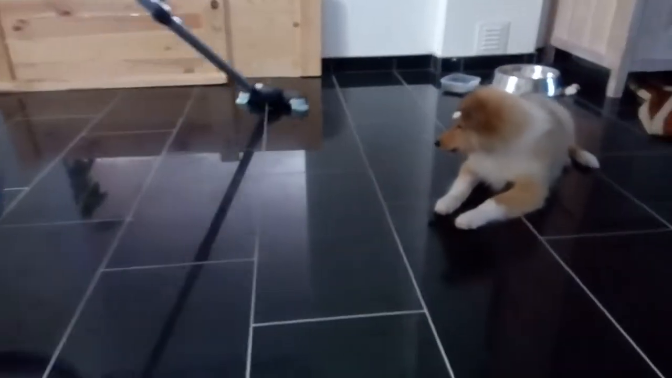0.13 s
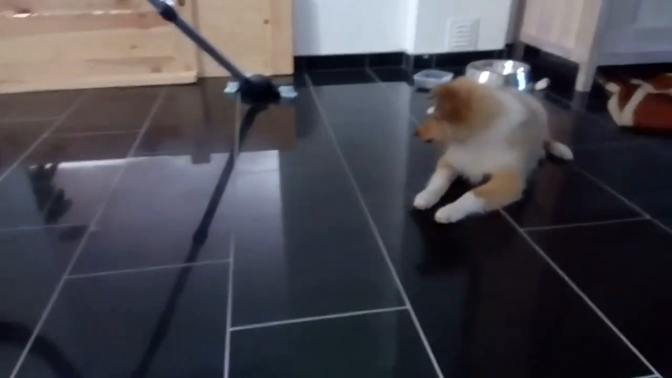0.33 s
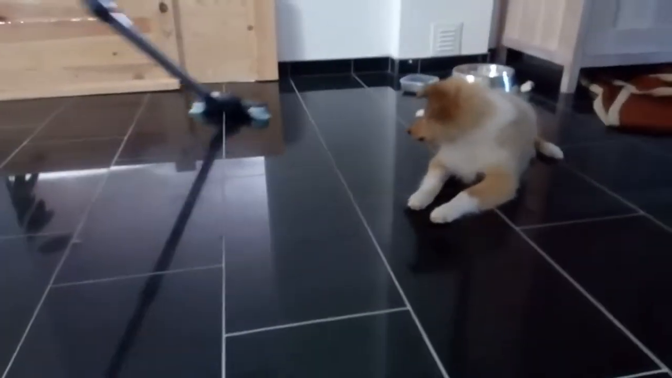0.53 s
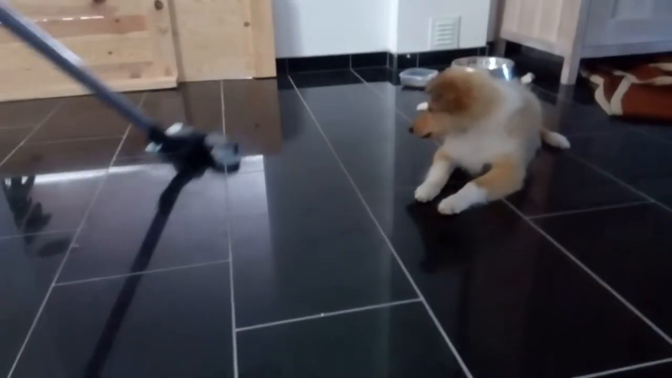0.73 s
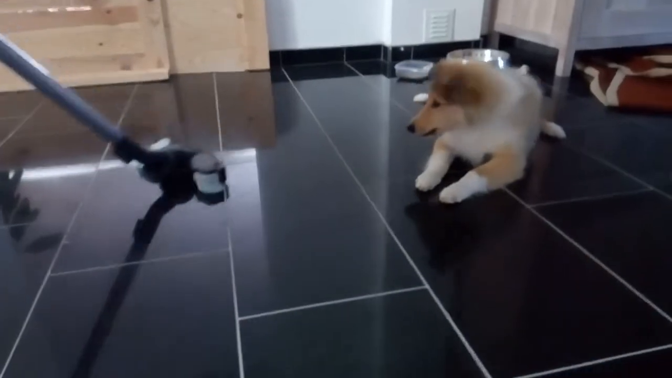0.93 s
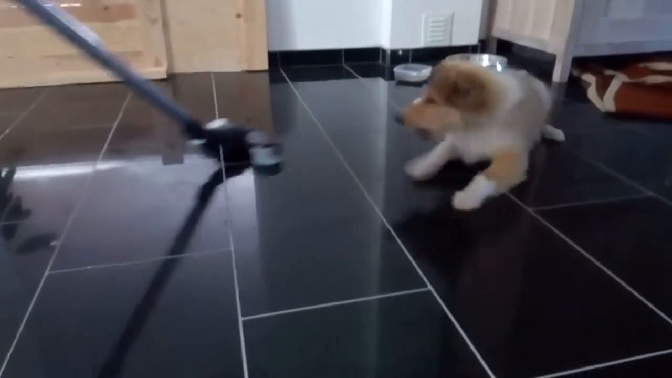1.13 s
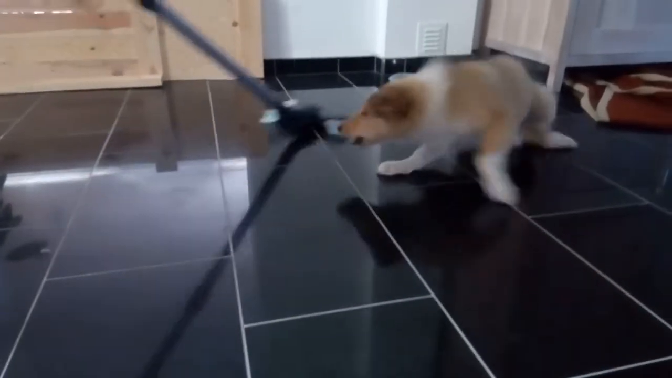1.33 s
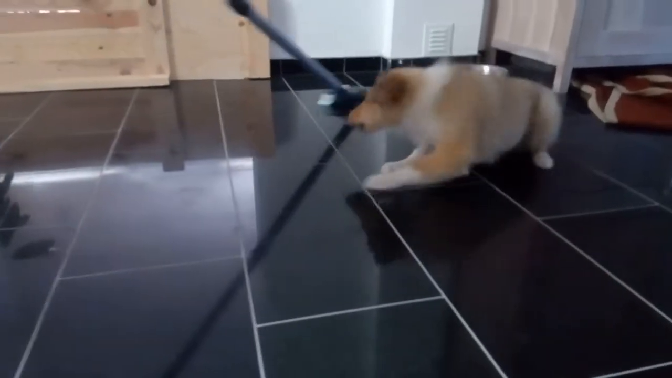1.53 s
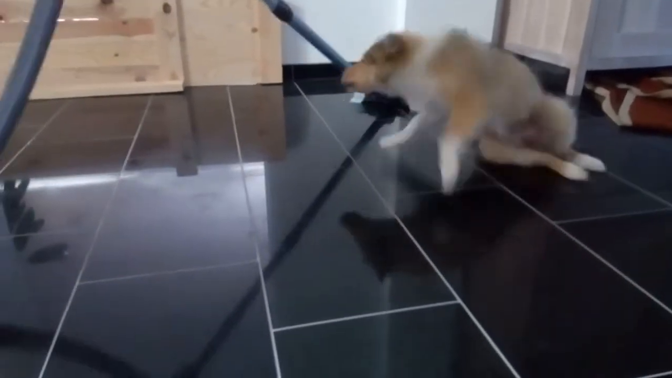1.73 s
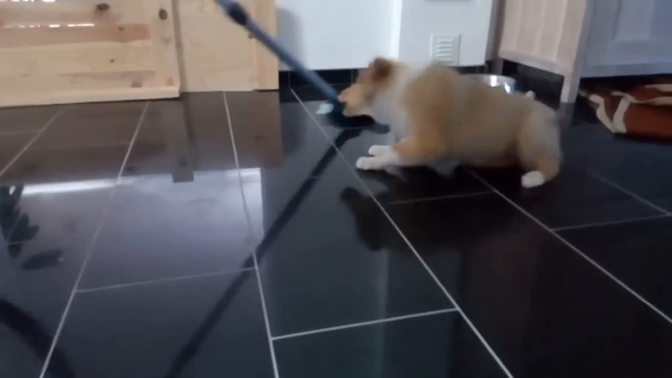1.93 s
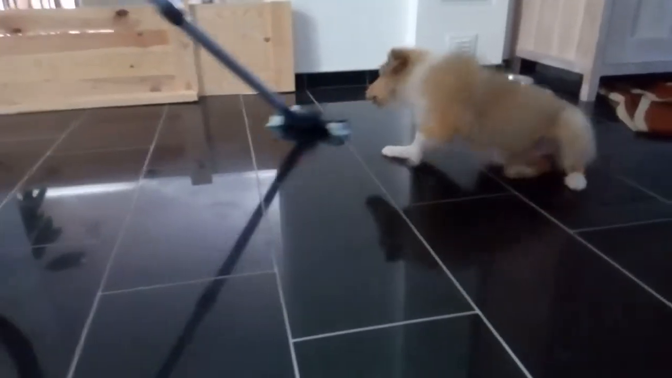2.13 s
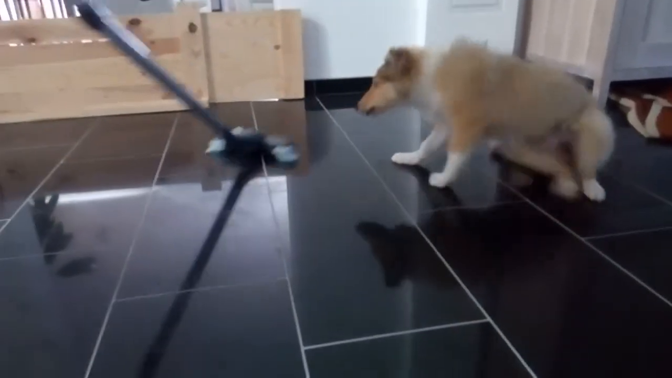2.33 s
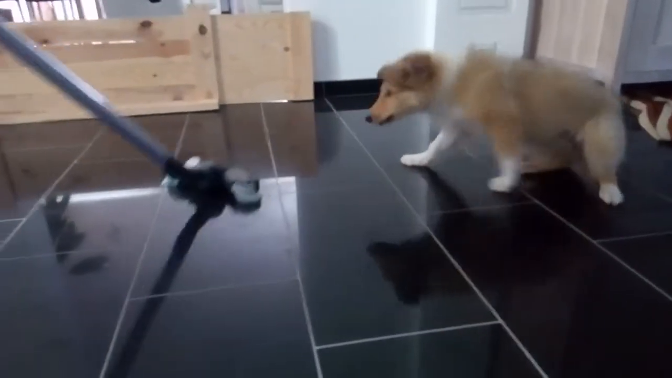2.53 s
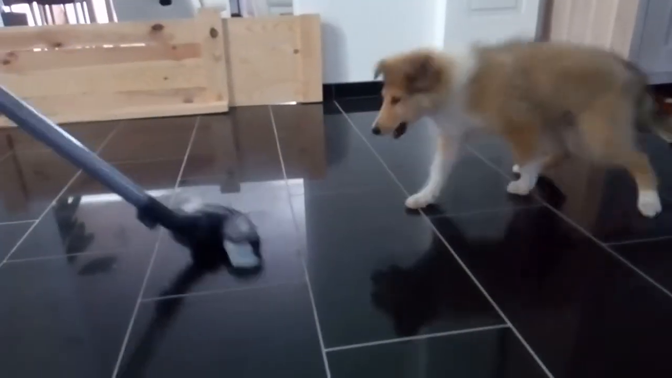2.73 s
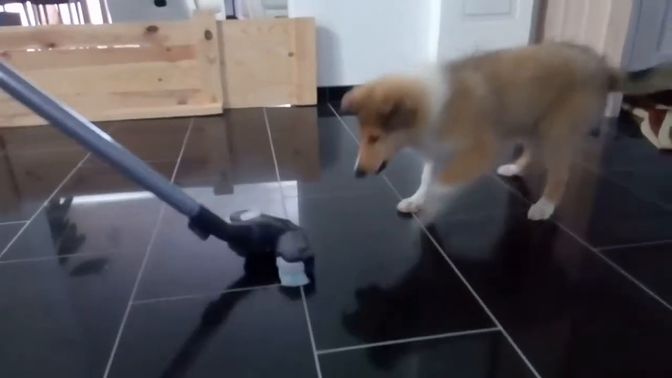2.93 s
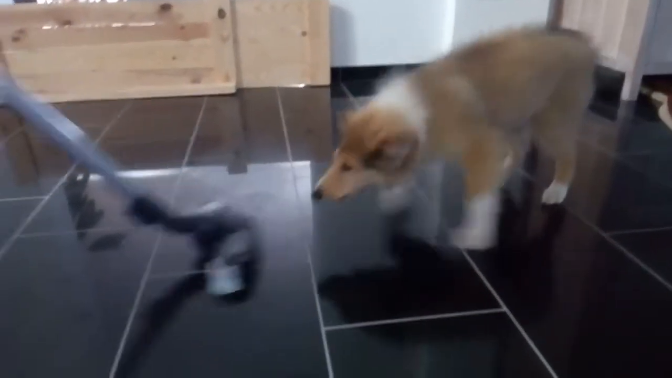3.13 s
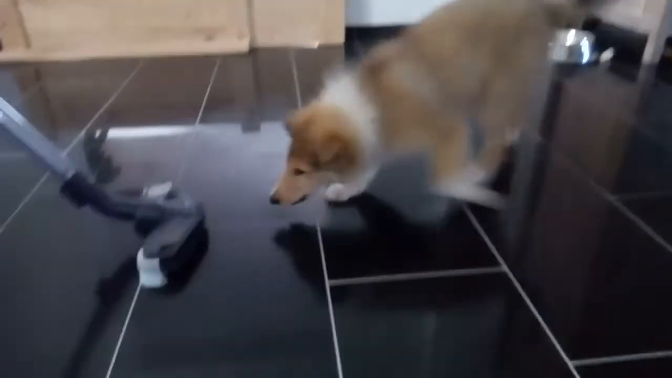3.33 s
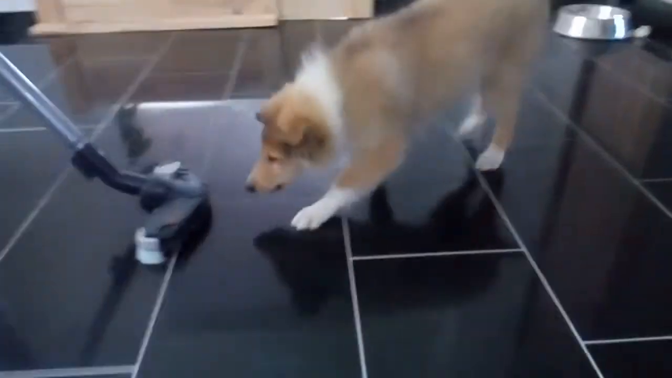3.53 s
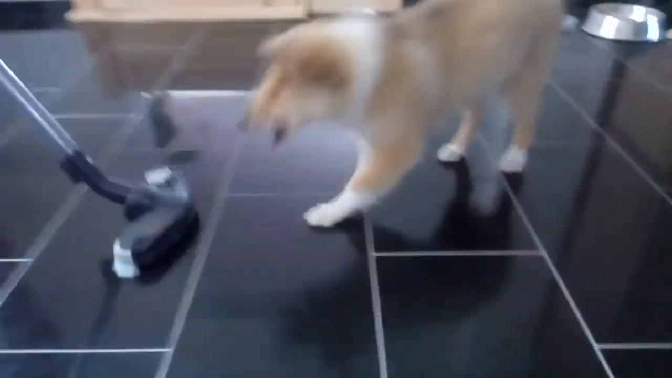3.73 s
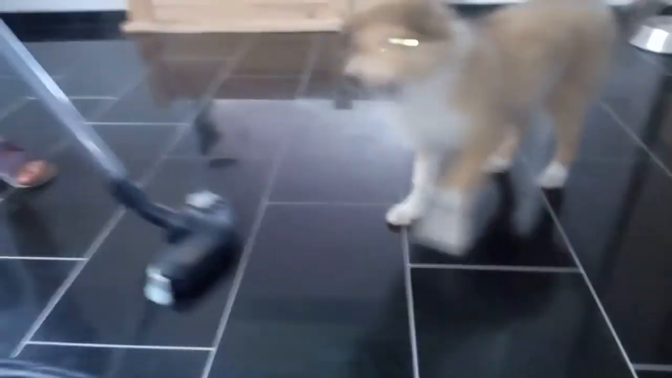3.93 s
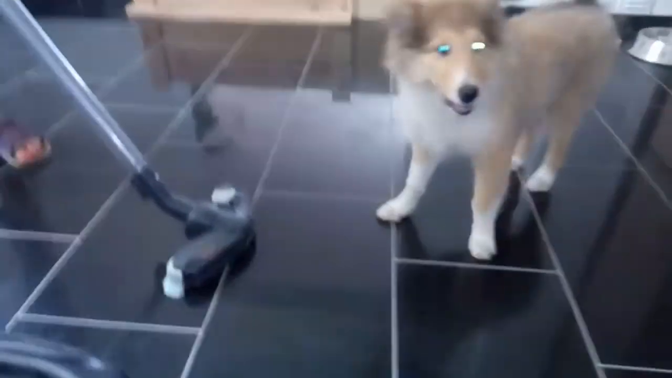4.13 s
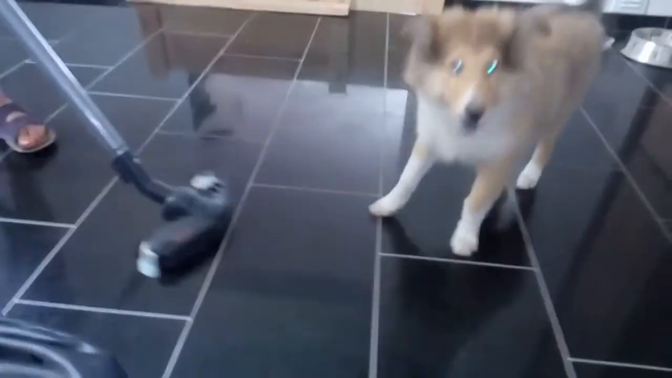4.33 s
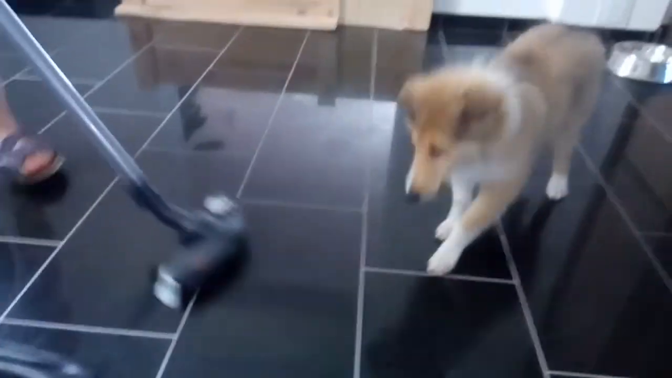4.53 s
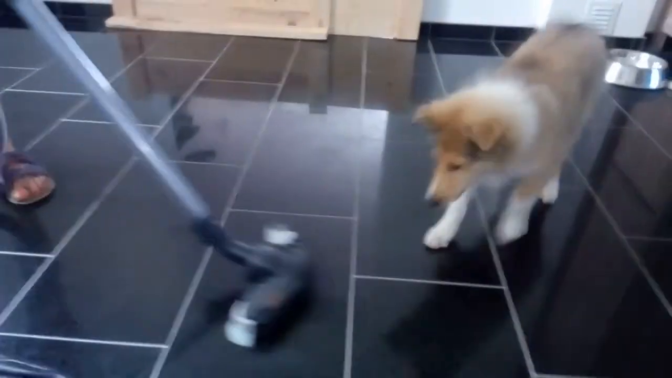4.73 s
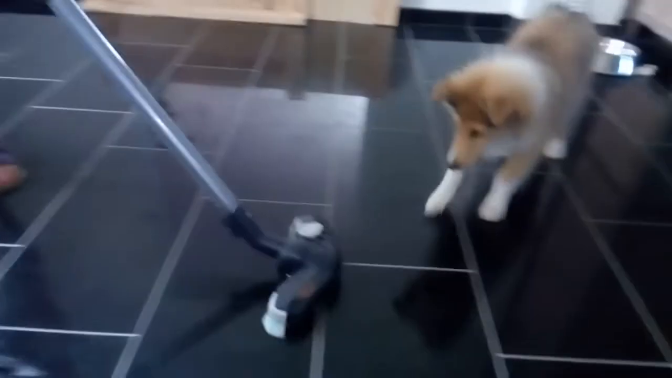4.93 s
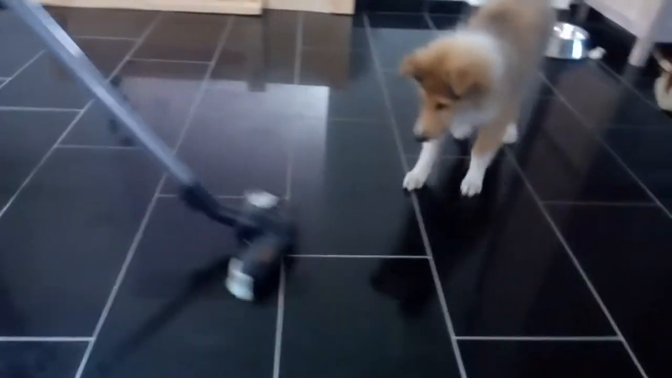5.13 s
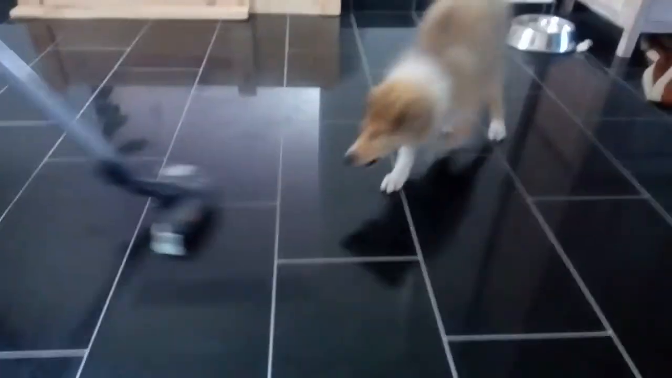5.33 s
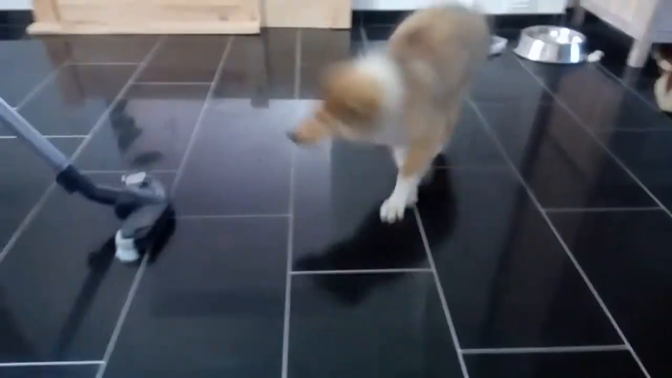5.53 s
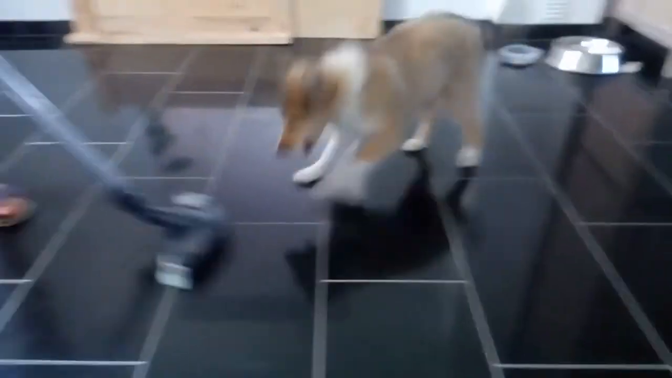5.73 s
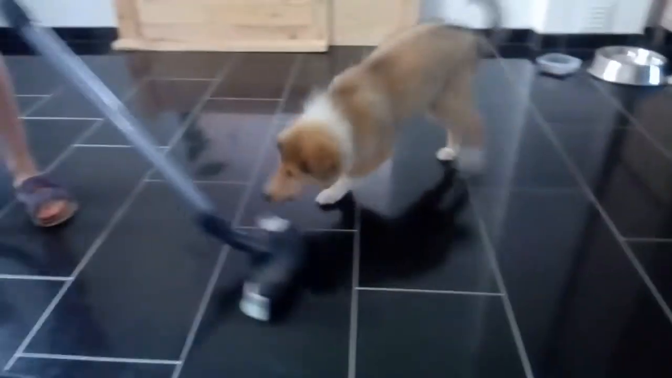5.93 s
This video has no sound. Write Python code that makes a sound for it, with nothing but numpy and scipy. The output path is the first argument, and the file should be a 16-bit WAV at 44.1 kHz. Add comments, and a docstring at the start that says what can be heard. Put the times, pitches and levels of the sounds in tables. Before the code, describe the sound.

A vacuum cleaner runs throughout with a steady airy hiss, low nozzle rumble and faint high fan whine. After about a second a puppy gives a quick run of sharp, cracking yelps, then a weak moan. Two more single barks come around the middle, then another close cluster near the end. The hard tiled room rings after each bark, and the close phone microphones distort on the peaks.

```python
"""Puppy against vacuum cleaner

A puppy barks in short bursts at a running vacuum cleaner in a hard, tiled room.
The vacuum is flickering air hiss, a nozzle rumble, an unsteady brush hum and a thin fan whine.
Each bark is a gliding stack of overtones shaped by the mouth; the room draws it out into a long ring.
A phone with one dull and one bright microphone overloads on the barks."""
import sys
import numpy as np
from scipy import signal
from scipy.fft import rfft, irfft, next_fast_len
from scipy.io import wavfile
from scipy.ndimage import uniform_filter1d

SR = 44100
rng = np.random.default_rng(int(sys.argv[2]) if len(sys.argv) > 2 else 0)


def generate_wav(signal):
    """Clip the signal to [-1, 1] and save it as 16-bit WAV at the path in sys.argv[1]."""
    frames = np.transpose(np.atleast_2d(signal))
    scaled = np.clip(frames, -1, 1) * 32767
    pcm = np.round(scaled).astype(np.int16)
    wavfile.write(sys.argv[1], SR, pcm)


N = 268569


def undb(db):
    """Turn decibels into an amplitude factor."""
    return 10 ** (np.asarray(db) / 20)


def on_log(points, hz):
    """Read (f/Hz, value) points on a log-frequency axis."""
    f, value = np.transpose(points)
    return np.interp(np.log(hz + 1), np.log(f), value)  # + 1 keeps 0 Hz readable


def colour(x, gain):
    """Filter by a gain function of frequency."""
    size = next_fast_len(x.shape[-1])
    spectrum = rfft(x, size) * gain(np.fft.rfftfreq(size, 1 / SR))
    return irfft(spectrum, size)[..., :x.shape[-1]]


def unit(x):
    """Scale to an RMS of 1."""
    return x / np.sqrt(np.mean(x ** 2))


def walk(rate):
    """Smooth random wander of spread 1; a higher rate (Hz) wanders faster."""
    k = max(int(SR / rate), 1)
    noise = rng.standard_normal(N + 2 * k)
    smooth = uniform_filter1d(uniform_filter1d(noise, k), k)
    return unit(smooth)[k:k + N]


def resonance(hz, centre_hz, width_hz):
    """Gain of a simple resonator: 1 at its centre, falling away on both sides."""
    return 1 / np.sqrt(1 + ((hz ** 2 - centre_hz ** 2) / (hz * width_hz)) ** 2)


def octave_band(x, centre_hz):
    """Cut out one band that fades to nothing an octave to either side."""
    def gain(f):
        octaves = np.clip(np.log2((f + 1) / centre_hz), -1, 1)
        return np.cos(np.pi / 2 * octaves) ** 2
    return colour(x, gain)


# Stereo width of diffuse sound: (f/Hz, likeness of left and right; below 0 is played as 0)
LIKENESS = [(60, 1), (110, 0.75), (190, 0.96), (330, 0.6), (570, 0.71), (1010, 0.3), (1770, -0.22),
            (3120, 0.21)]


def diffuse(count):
    """Two-channel noise, mostly alike in the bass and wider higher up, as mid plus and minus side."""
    mid, side = rng.standard_normal((2, count))
    mid = colour(mid, lambda f: np.sqrt((1 + np.clip(on_log(LIKENESS, f), 0, 1)) / 2))
    side = colour(side, lambda f: np.sqrt((1 - np.clip(on_log(LIKENESS, f), 0, 1)) / 2))
    return np.array([mid + side, mid - side])


# Vacuum mix ahead of the microphones: (t/s, air hiss level/dB, nozzle rumble level/dB, brush hum level/dB)
VACUUM_LEVELS = [(0, -27.5, -37, -54), (.8, -28.5, -34.5, -52), (3.0, -28, -34, -56),
                 (4.2, -27, -34, -39.5), (4.901, -28, -31, -38), (5.2, -27.5, -35, -45),
                 (6.09, -27, -38, -44)]
# Tone of the air hiss: (f/Hz, relative level/dB per Hz)
HISS_SPECTRUM = [(30, -27), (100, -16.5), (200, -30.5), (400, -0.5), (700, 6.5), (1100, 8), (1500, 5.5),
                 (2000, 0), (2800, 2), (4000, -3), (5200, -3), (6300, -9.5), (7200, -19.5), (8500, -36.5),
                 (11000, -37.5), (15000, -78)]
RUMBLE_HZ, RUMBLE_WIDTH_HZ = 525, 1510
HUM_HZ, WHINE_HZ, WHINE_DB = 264, 6616, -63


def vacuum():
    """Air hiss whose bands flicker a little, rumble of the nozzle on the tiles, hum and fan whine."""
    t = np.arange(N) / SR
    times, *columns = np.transpose(VACUUM_LEVELS)
    hiss_db, rumble_db, hum_db = (np.interp(t, times, column) for column in columns)

    air = colour(diffuse(N), lambda f: undb(on_log(HISS_SPECTRUM, f)))
    hiss = 0
    for centre_hz in 60 * 2. ** np.arange(9):
        flicker_db = .7 * walk(9)
        hiss = hiss + octave_band(air, centre_hz) * undb(flicker_db)

    rumble = colour(diffuse(N), lambda f: resonance(f + 1, RUMBLE_HZ, RUMBLE_WIDTH_HZ) ** 2)
    rumble = rumble * undb(1.3 * walk(1.4))  # slow swells

    hum_pitch = HUM_HZ * (1 + 0.0276 * walk(9.1))
    hum = undb(2.6 * walk(36)) * np.sin(2 * np.pi * np.cumsum(hum_pitch) / SR)
    whine_pitch = WHINE_HZ * (1 + 0.00039 * walk(9))
    whine = np.sin(2 * np.pi * np.cumsum(whine_pitch) / SR)

    noises = undb(hiss_db) * unit(hiss) + undb(rumble_db) * unit(rumble)
    return noises + undb(hum_db) * hum + undb(WHINE_DB) * whine


# Decay of the tiled room: (f/Hz, time to fall by 60 dB/s)
ROOM_DECAY = [(200, 0.1), (800, 0.75), (2000, 1), (4000, 0.36), (9000, 0.18)]
ROOM_GAP_S, ROOM_BUILD_S = .012, 0.0043  # silence before the first echo, then time constant of the build-up


def room():
    """Echo tail for each microphone: octave bands of diffuse noise die at their own rate."""
    t = np.arange(int(1.2 * SR)) / SR
    noise = diffuse(len(t))
    tail = 0
    for centre_hz in 125 * 2. ** np.arange(7):
        decay = 1000 ** (-t / on_log(ROOM_DECAY, centre_hz))
        tail = tail + octave_band(noise, centre_hz) * decay
    tail = tail * (1 - np.exp(-np.maximum(t - ROOM_GAP_S, 0) / ROOM_BUILD_S))  # echoes arrive late and pile up
    return tail / np.sqrt(np.mean(np.sum(tail ** 2, axis=1)))


MOUTH_WIDTH_HZ, THROAT_HZ, THROAT_WIDTH_HZ, MUZZLE_TOP_HZ = 560, 3000, 1000, 3900


def vocal_tract(f, mouth_hz, throat_db):
    """Mouth resonance plus throat resonance; little gets out of the muzzle above them."""
    mouth = resonance(f, mouth_hz, MOUTH_WIDTH_HZ) ** 2
    throat = undb(throat_db) * resonance(f, THROAT_HZ, THROAT_WIDTH_HZ) ** 2
    return (mouth + throat) / np.sqrt(1 + (f / MUZZLE_TOP_HZ) ** 12)


CORD_TILT_DB = -3  # per octave of overtone number
RASP_HZ, RASP_WIDTH_HZ = 1800, 970
ATTACK_S, RELEASE_S = 0.0086, 0.0068
# A bark scoops up in the chest voice, breaks into a high yelp that falls, and may trail off in a low moan.
# One row per note, ahead of room and microphones: (start t/s, length t/s, pitch at start f/Hz,
#     at middle f/Hz, at end f/Hz, level/dB, swell from start to end level/dB, mouth resonance over pitch,
#     throat resonance level/dB, roughness 0-1, every-second-cycle share 0-1, squared when played)
BARK_NOTES = [ (1.152, .043, 769.5, 907.4, 953, -5, 7, 0.97, -9, 0.14, .1),
              (1.188, 0.047, 1531, 1586, 1492, -9.5, 0.5, 0.96, 1, .4, 0.91),
              (1.232, 0.085, 1487, 1387, 1240, -12, -6, 1, -3, 0.13, 0.23),
              (1.36, 0.037, 803, 807.5, 822, -9.5, 5, 1.17, -23, 0.052, .2),
              (1.412, 0.045, 824, 812, 730, -18, -3, 1.5, -11, 0.083, 0.37),
              (1.642, 0.027, 754, 825, 860, -7.5, 15, 1.3, -16, 0.088, .05),
              (1.666, 0.0299, 1327, 1459, 1560, -8, 2.5, 0.8, -7, 0.45, 0.74),
              (1.693, 0.085, 1502, 1487, 1180, -11.5, -10, 0.9, -20, 0.11, 1),
              (1.853, 0.083, 461, 444, 420, -22, -10, 1.8, -4, 0.23, 0.87),
              (1.938, 0.079, 622, 839.6, 944, -9.5, 1, 1.3, -26, 0.08, .06),
              (2.022, 0.085, 865, 783, 787, -14.5, -10.5, 1.18, -14.5, 0.26, 0.47),
              (2.368, 0.062, 546, 540, 532, -26.5, 7, 4.44, -17, 0.12, .1),
              (2.424, 0.11, 527, 420, 376, -26, -14, 1.51, -21, 0.11, 0.19),
              (3.068, 0.033, 837, 927, 988, -4.5, -4.5, 1.22, -13.5, 0.05, .02),
              (3.097, 0.064, 1516, 1821, 1746, -8.5, -5, 1.134, -5, .35, .6),
              (3.16, 0.057, 1746, 1195, 634, -16, -7, 0.97, -13, 0.1, 0.13),
              (3.225, 0.2, 890, 860.3, 820, -23.5, -2.5, 2.05, -2.5, 0.29, .2),
              (3.236, 0.1, 524.6, 425, 368, -25.5, 6.5, 0.74, -4, 0.037, 0.41),
              (3.672, 0.056, 346.4, 429, 699, -23, 9, 1.36, -3, 0.26, 1),
              (3.72, 0.051, 658, 818, 887, -8, 3, 1.31, -19, 0.15, .02),
              (3.77, 0.051, 1051, 1129, 1115, -17, -22.5, 1.9, -18.5, 0.14, .1),
              (3.782, 0.037, 1770, 1514, 1162, -13.5, 22, 1.0, -15, 0.46, .02),
              (3.815, 0.052, 1116, 978.7, 755, -10, 4, 1.04, -9, 0.15, .02),
              (5.192, 0.039, 679, 852.6, 958, -8, 15, 1.455, -24.5, 0.07, .05),
              (5.226, 0.041, 1501, 1584, 1550, -7, -8, 1.157, -17, 0.28, 0.67),
              (5.261, .055, 1632, 1722, 1248, -10, -3, 1.2, -24, 0.11, .2),
              (5.31, 0.065, 1244, 953.6, 708, -16.5, -2, 1.15, -9, 0.56, 0.14),
              (5.37, 0.073, 619, 567.4, 518, -22, 3, 0.9, 12, 0.42, 0.99),
              (5.447, 0.056, 559, 767, 797, -11.5, 3.5, 1.42, -21, 0.088, 0.12),
              (5.494, .066, 1495, 1582, 1727, -12.5, -21.5, 1.02, -17, 0.2, 0.89),
              (5.558, 0.107, 1332, 1314, 1315, -14, -4, 1.2, -29, 0.22, 0.11),
              (5.877, .026, 966, 1050, 1200, -9.5, 7, 1.49, -29, 0.043, 0.34),
              (5.897, 0.033, 1306, 1472, 1500, -5.5, -5, 1.13, -7, 0.21, .15),
              (5.934, 0.07, 836.6, 796.6, 747, -8, -11.5, 1.42, -24.5, 0.13, 0.24), ]


def puppy():
    """Overtones of the vocal cords through mouth and throat; rough cords waver in pitch and size."""
    out = np.zeros(N)
    # air rushing through cords that do not close cleanly
    breath = rng.standard_normal(N)
    rasp = unit(colour(breath, lambda f: resonance(f + 1, RASP_HZ, RASP_WIDTH_HZ) ** 2))
    waver, flutter = .07 * walk(400), walk(300)  # of pitch and of size

    for start, length, hz0, hz1, hz2, db, swell_db, gape, throat_db, rough, half in BARK_NOTES:
        at = np.arange(int(start * SR), min(int((start + length) * SR), N))
        t = at / SR - start
        u = t / length
        # an arch through three pitches
        pitch = hz0 * (1 - u) * (1 - 2 * u) + hz1 * (2 * u) * (2 - 2 * u) + hz2 * u * (2 * u - 1)
        fades = np.clip(t / ATTACK_S, 0, 1) * np.clip((length - t) / RELEASE_S, 0, 1)
        gain = undb(db + swell_db * (u - .5)) * fades
        half_phase = np.pi * np.cumsum(pitch * (1 + rough * waver[at])) / SR  # runs at half the pitch

        tones, power = 0, 0
        # half-steps of the pitch: odd ones sound when strong and weak cycles alternate
        for k in range(1, 17):
            tract = vocal_tract(k * pitch / 2, gape * pitch, throat_db)
            share = np.clip(half, 0, 1) ** 2 if k % 2 else 1
            size = tract * undb(CORD_TILT_DB * np.log2(k / 2)) * share
            tones = tones + size * np.sin(k * half_phase + k * k)
            power = power + size ** 2 / 2

        voiced = (1 + rough * flutter[at]) * tones / np.sqrt(power)
        out[at] += gain * (voiced + rough * rasp[at])
    return out


# How much of the voice reaches the phone by way of the walls as the puppy turns: (t/s, level/dB)
WALL_SEND = [(1.15, -5.5), (1.4, -1), (1.701, -2), (2.0, -4.5), (2.45, -9.5), (3.08, -4.5), (3.15, -1.5),
             (3.75, -3), (3.85, -4.5), (5.2, -4), (5.5, -0.5), (5.9, -4)]


def scene():
    """The puppy, direct and through the room, over the vacuum cleaner."""
    voice = puppy()
    direct = np.array([np.roll(voice, 3), voice])  # the left side hears it 3 samples later
    walls = voice * undb(np.interp(np.arange(N) / SR, *np.transpose(WALL_SEND)))
    ring = signal.fftconvolve(walls[None], room(), axes=1)[:, :N]
    return direct + ring + vacuum()


# Tone of the left microphone, the right being its mirror in dB: (f/Hz, level/dB)
LEFT_MIC_TONE = [(100, 1), (600, 0.8), (1300, -0.45), (2200, -4), (3000, -2), (4200, -5), (6400, -6.5),
                 (8500, -8), (14000, -6)]
GAIN_DB, TOP_HZ = -1.37, 15100


def record(dry):
    """Dull left and bright right microphone, a converter that clips at full scale, a steep top cut."""
    mirror = np.array([[1], [-1]])
    mics = colour(dry, lambda f: undb(GAIN_DB + mirror * on_log(LEFT_MIC_TONE, f)))
    clipped = np.clip(mics, -1, 1)
    top_cut = signal.ellip(8, .2, 70, TOP_HZ, fs=SR, output="sos")
    return signal.sosfilt(top_cut, clipped)


dry = scene()
out = record(dry)
generate_wav(out)
```